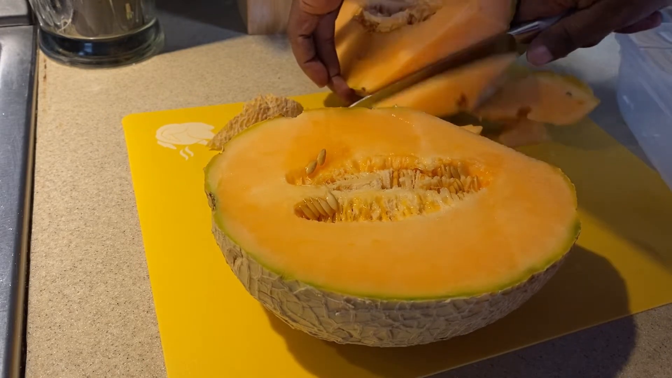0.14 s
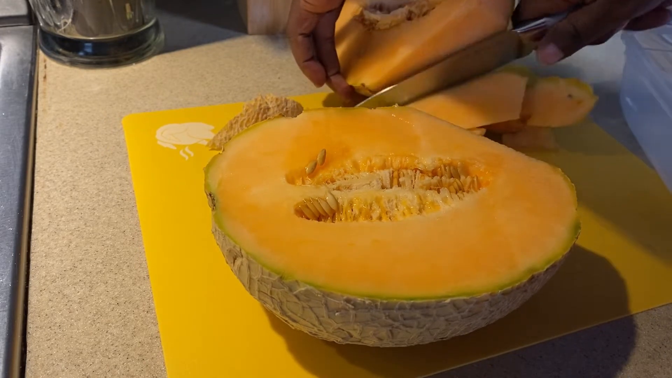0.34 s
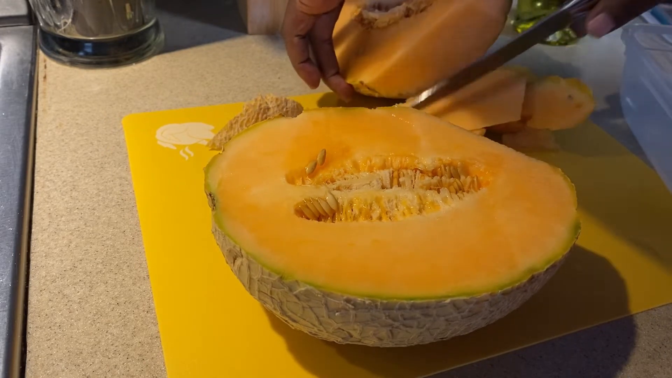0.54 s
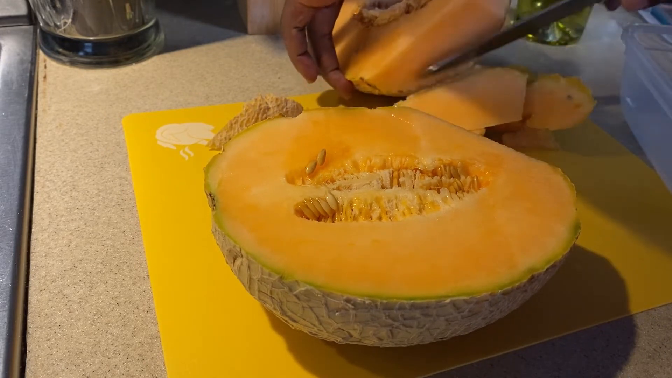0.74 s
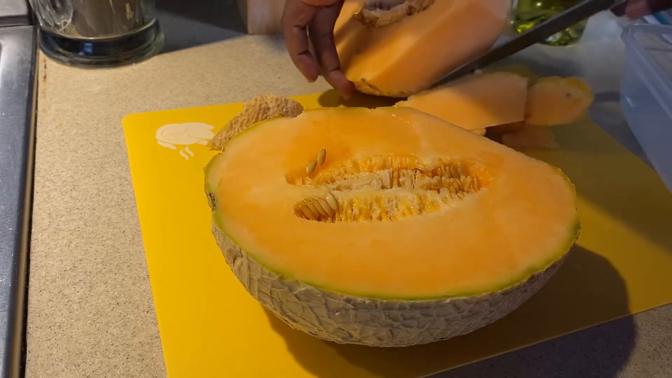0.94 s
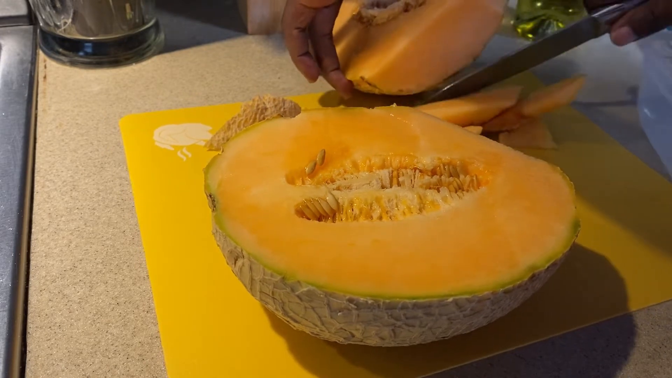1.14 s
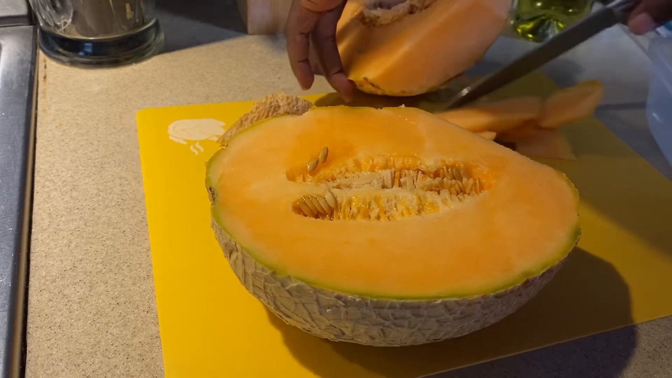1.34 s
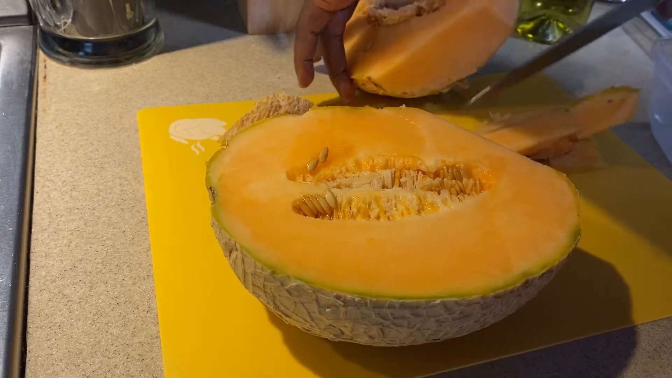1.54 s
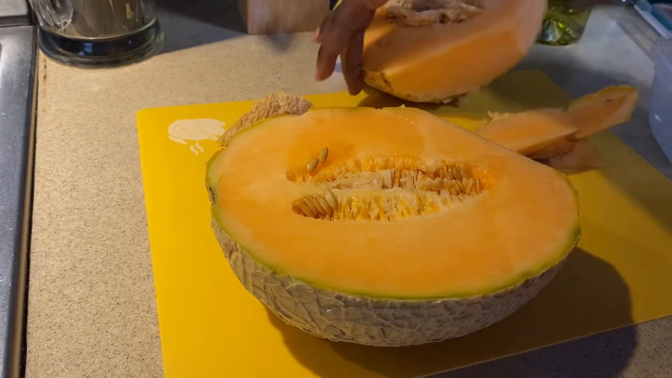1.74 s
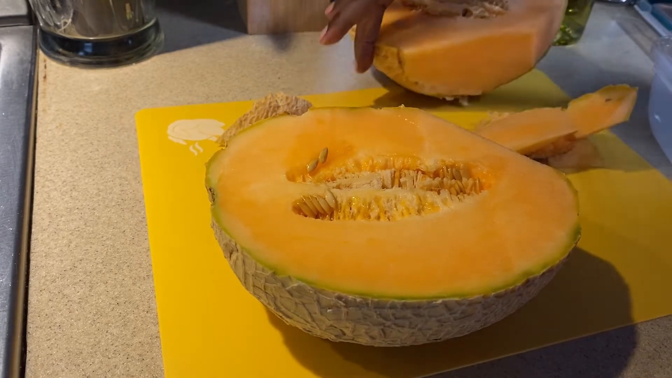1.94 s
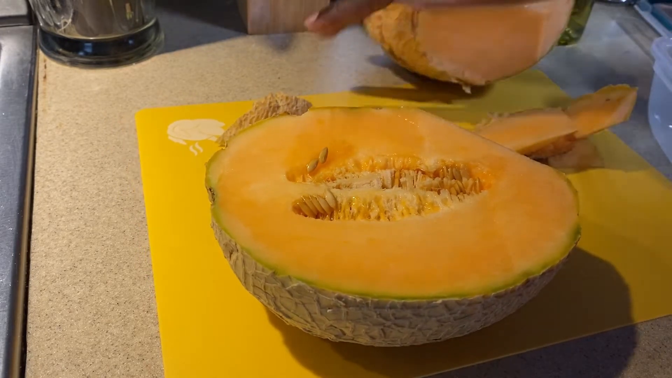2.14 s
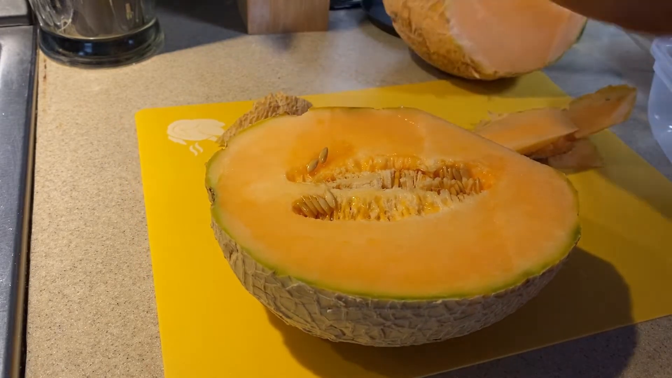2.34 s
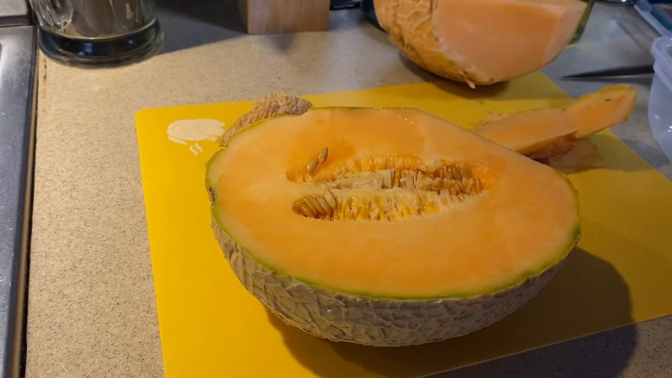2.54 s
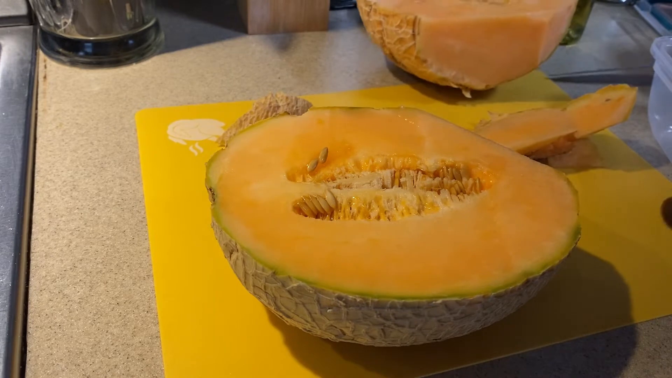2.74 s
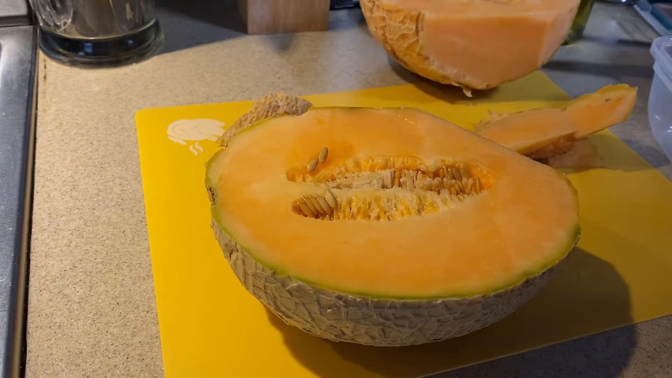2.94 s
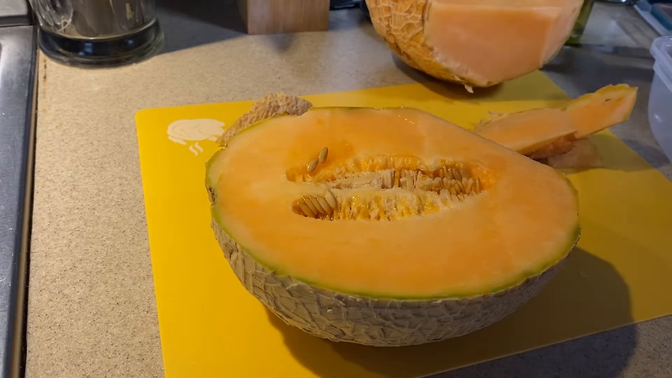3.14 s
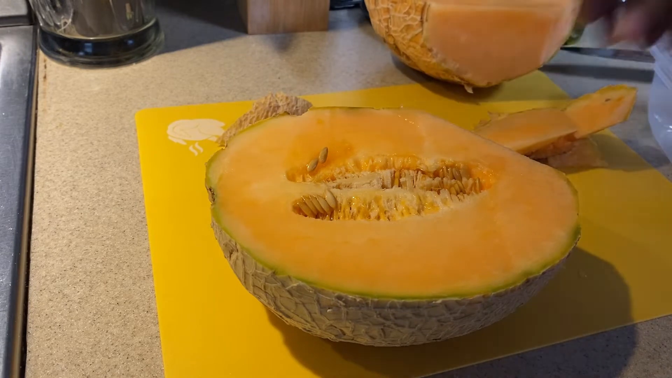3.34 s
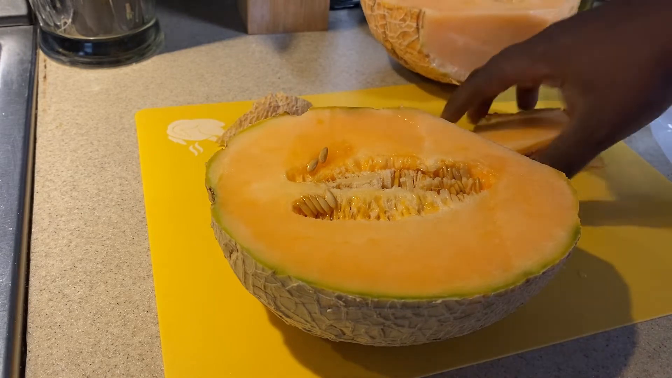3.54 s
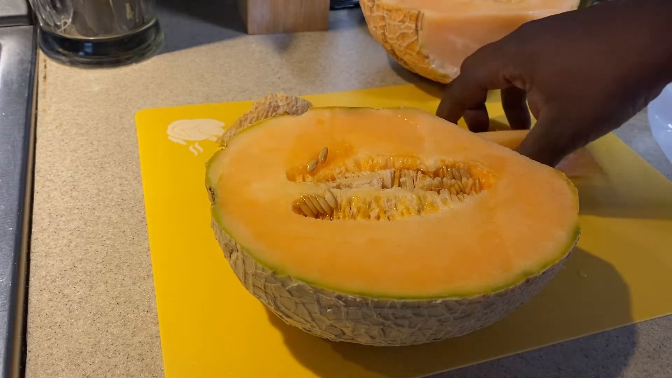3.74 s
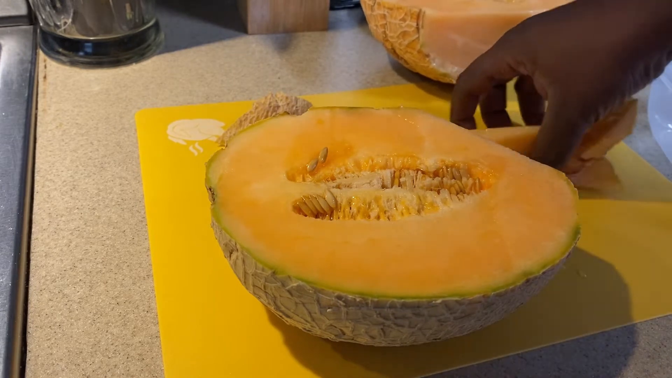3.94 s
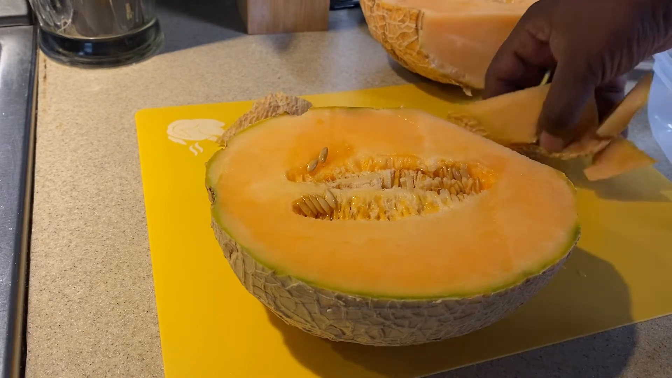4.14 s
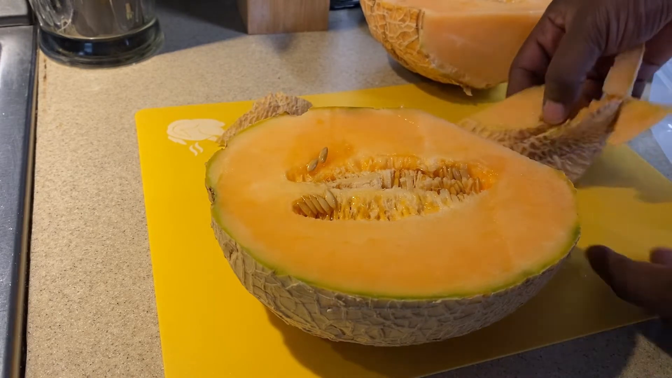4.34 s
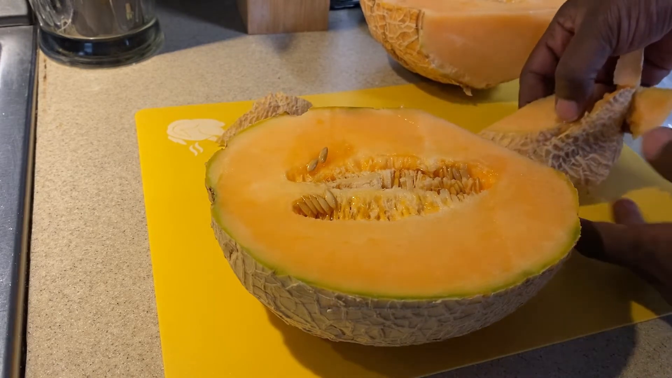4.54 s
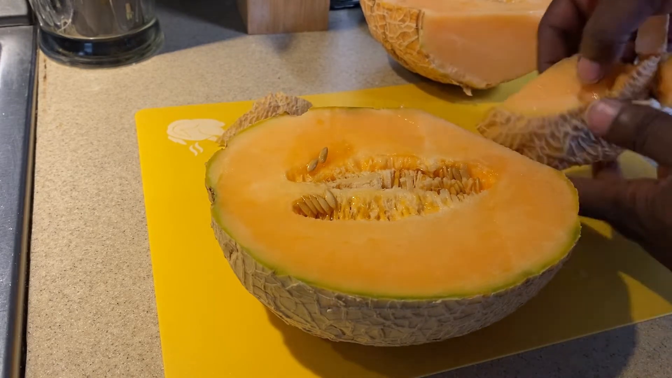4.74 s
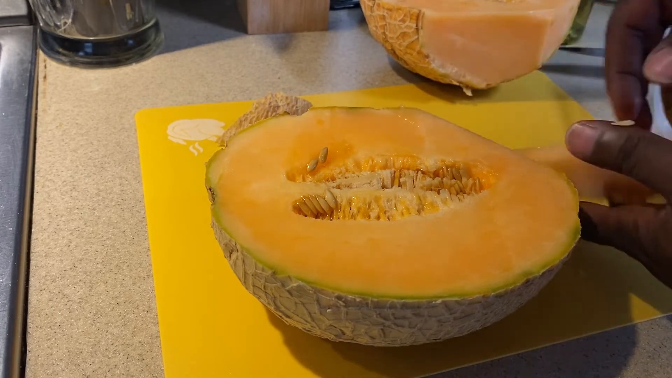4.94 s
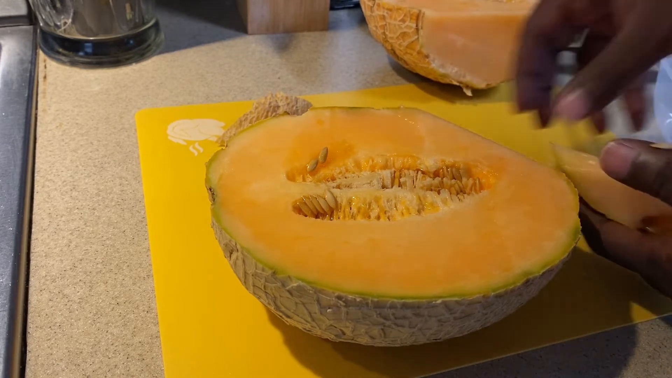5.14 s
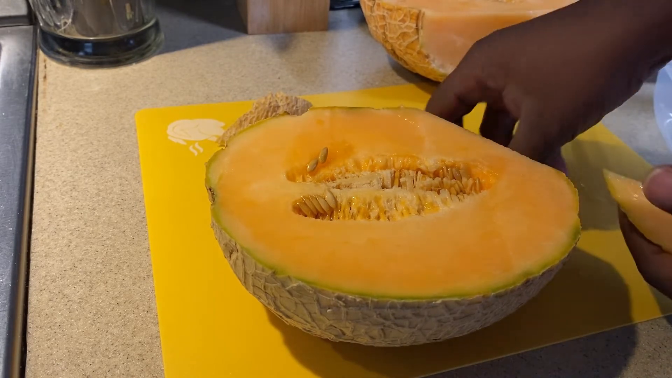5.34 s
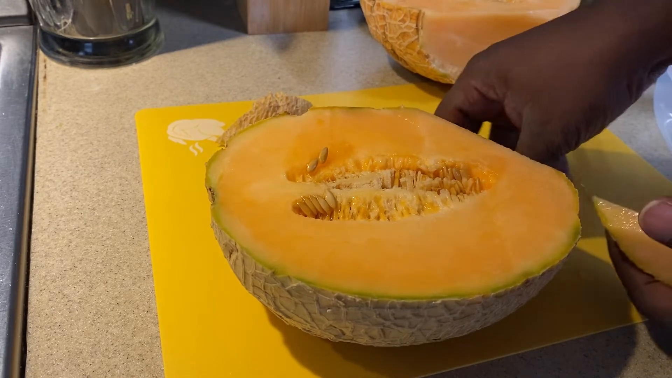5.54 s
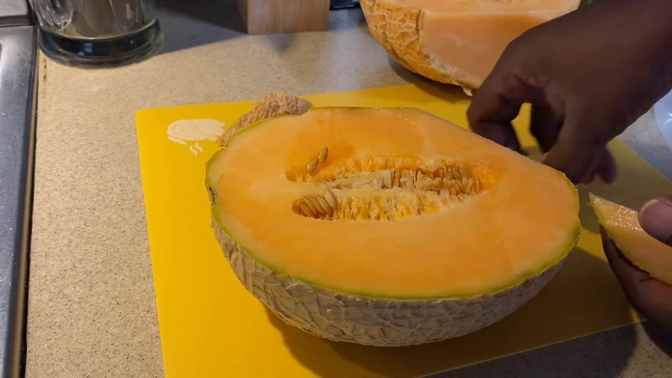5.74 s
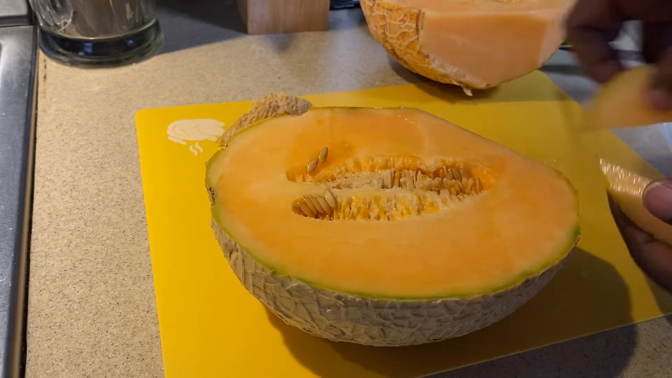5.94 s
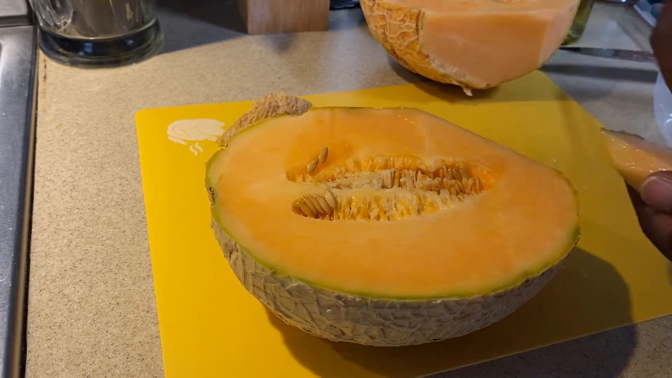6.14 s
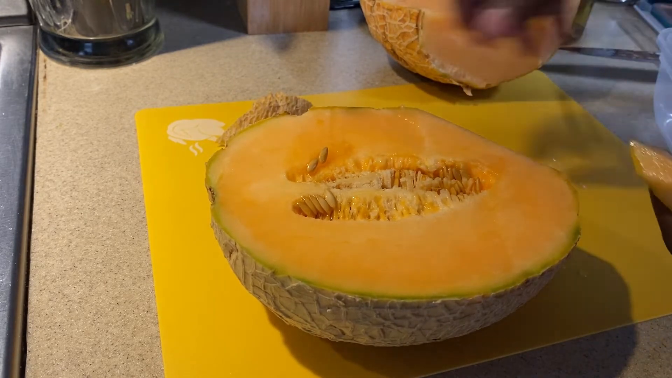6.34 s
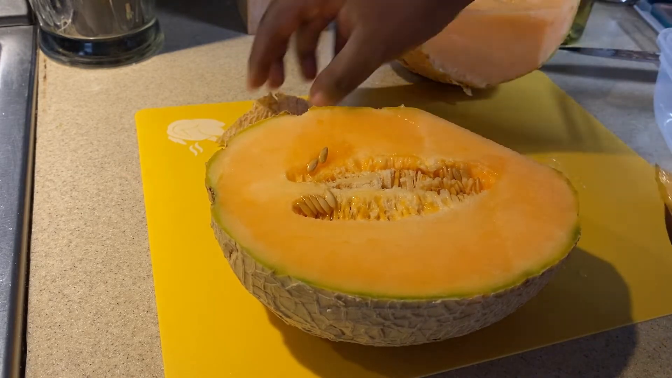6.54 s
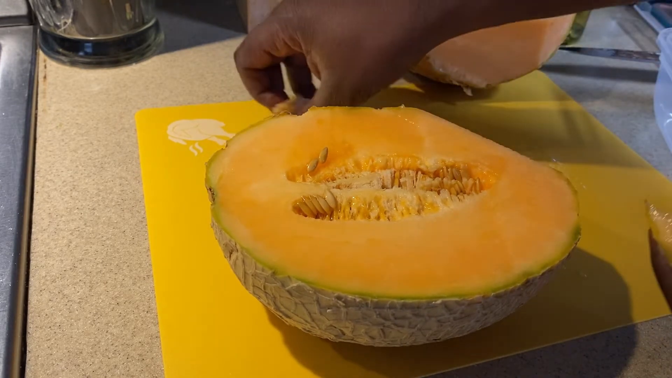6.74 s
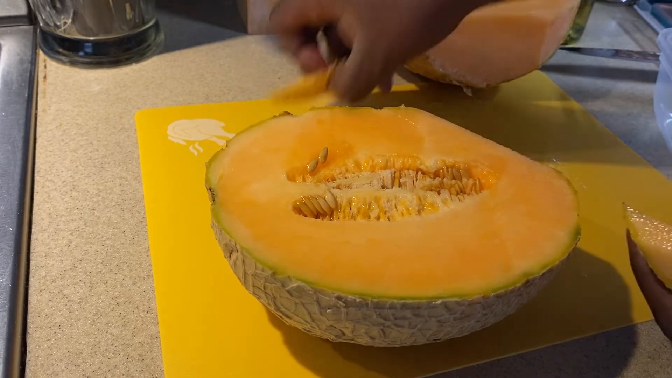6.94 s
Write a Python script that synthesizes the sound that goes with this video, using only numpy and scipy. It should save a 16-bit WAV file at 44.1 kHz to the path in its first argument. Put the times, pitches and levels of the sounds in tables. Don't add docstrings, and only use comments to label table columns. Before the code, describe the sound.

A close phone pickup in a small, hard kitchen with a very quiet, low room floor. From 0 to 0.35 seconds a knife makes a cluster of soft ticks and dull low knocks through melon onto a thin plastic board, with a faint steel ring near 0.45. After near quiet, at 1.0 to 1.2 it breaks through: a loud, crunchy double crack and woody knock, with a wet gritty scrape fading behind. Tiny scuffs follow around 1.7 and 2.2. At 2.5 the steel blade is laid down with a sharp clack and bright, quickly damped ring. From 2.95 to 3.25 the hollow melon half bumps down in rapid dull thuds over a low rumble. From 3.55 to 5.6 hands gather wet slices with soft hisses, drags, and light taps, the clearest near 3.65 and 5.3. A small tick and scuff come at 6.6, then tiny crackling scrapes near 7.

```python
import sys
import numpy as np
from scipy import signal
from scipy.fft import rfft, irfft, next_fast_len
from scipy.io import wavfile
from scipy.ndimage import uniform_filter1d, map_coordinates

SR = 44100
rng = np.random.default_rng(int(sys.argv[2]) if len(sys.argv) > 2 else 0)


def int16_out(signal):
    q = np.round(np.clip(np.atleast_2d(signal).T, -1, 1) * 32767)
    wavfile.write(sys.argv[1], SR, q.astype(np.int16))


def amplitude_ratio(level_db):
    exponent = np.asarray(level_db, float) / 20
    return 10 ** exponent


N = 308697


def unit(x):
    return x / np.sqrt(np.mean(x ** 2) + 1e-20)


def peak1(x):
    return x / (np.abs(x).max() + 1e-20)


def along(points, hz):
    f, v = np.transpose(points)
    return np.interp(np.log(hz + 1), np.log(f + 1), v)


def wobble(rate):
    knots = rng.standard_normal(int(N * rate / SR) + 4)
    return map_coordinates(knots, [np.arange(N) * rate / SR])


def filtered(x, response):
    n = x.shape[-1]
    m = next_fast_len(n + 8192)
    return irfft(rfft(x, m) * response(np.fft.rfftfreq(m, 1 / SR)), m)[..., :n]


def tilt(db_per_octave, hz):
    return amplitude_ratio(db_per_octave * np.log2((hz + 200) / 4000))


def radiated(hz):
    return (1j * hz / (1j * hz + 70)) ** 2


def add(track, s, sound, pan_db):
    lags = (8 if s < 1.5 else 1, 0)
    for ch, part in enumerate(np.broadcast_to(sound, (2, sound.shape[-1]))):
        track[ch, round(s * SR) + lags[ch]:][:len(part)] += part * amplitude_ratio(pan_db * (1.5 - ch))


def crackle(rate, size):
    ticks = (rng.random(N) < rate / SR) * rng.exponential(1, N)
    decay_s = 0.00049
    return 1 + size * signal.lfilter([1], [1, -np.exp(-1 / (decay_s * SR))], ticks)


def rush(spectrum, patchy_db, grit_db):
    # f/Hz, left-right likeness
    alike = [(60, 0.93), (240, 0.56), (950, 0.39), (3770, 0.73), (15000, 0.65)]
    z = signal.stft(rng.standard_normal((2, N)), nperseg=512)[2]
    field = uniform_filter1d(rng.standard_normal(z.shape[1:]), size=7, axis=0)
    field = uniform_filter1d(field, size=6, axis=1)
    pair = signal.istft(z * amplitude_ratio(patchy_db * unit(field)), nperseg=512)[1][:, :N]
    pair = pair * amplitude_ratio(grit_db * wobble(180))

    def shares(hz):
        turn = np.arccos(np.clip(along(alike, hz), 0, 1)) / 2
        return amplitude_ratio(along(spectrum, hz)) * [np.cos(turn), np.sin(turn)]

    mid, side = filtered(pair, shares)
    return unit(np.array([mid + side, mid - side]))


def held(rows, column, rise_db_s, fall_db_s):
    rows, t = np.array(rows), np.arange(N) / SR
    start, db = rows[:, :1], rows[:, column, None]
    end = start + abs(rows[:, 1:2])
    return amplitude_ratio(db - rise_db_s * np.maximum(start - t, 0) - fall_db_s * np.maximum(t - end, 0))


def sliding():
    # t/s, held/s, hiss level/dB, tilt/(dB/octave)
    strokes = [(0, 0.023, -75, 2.5), (0.368, 0.038, -78, -3.5), (1.0, 0.056, -76, 12.5),
               (1.173, 0.2, -54, -3), (2.3, 0.41, -72, -3.5), (3.101, 0.017, -58, -6),
               (3.3, 0.022, -78.5, -6), (3.719, 0.17, -67, -3.5), (3.9, 0.43, -67.5, -4),
               (4.379, .14, -61.5, 1), (4.939, 0.28, -80.5, 1.5), (5.33, .06, -72.5, -0.5),
               (5.481, .03, -66.5, -5), (6.67, 0.08, -66, -1.35)]
    # t/s, held/s, drag level/dB, counter rumble level/dB
    presses = [(0, 0.011, -64, -54.5), (.2, 0.008, -63, -43), (.31, 0.007, -53.5, -69),
               (1.15, 0.0026, -29.5, -44), (1.3, 0.13, -54.5, -64), (2.3, 0.12, -64, -62),
               (2.55, 0.06, -43.5, -54.5), (3.09, 0.12, -34.5, -42.5), (3.25, 0.01, -62, -51),
               (3.74, 0.065, -55.5, -59), (3.9, 0.646, -71, -67.5), (4.66, 0.021, -77, -59.5),
               (5.46, 0.15, -73.5, -71), (6.75, 0.19, -76.5, -66)]
    # t/s, rumble level/dB
    floor = [
        (0.0, -58),
        (0.25, -64.5),
        (7.0, -65.5),
    ]
    # f/Hz, density/(dB per Hz)
    hiss_colour = [(800, -19.5), (1400, -9), (3500, -6), (5500, -9), (7500, -7.5), (9500, -9.5),
                   (12000, -12), (14500, -14), (16000, -24), (16500, -61.5)]
    drag_colour = [(130, -34), (220, -7.5), (346, -0.5), (720, -9.5), (872, -8.5), (1020, -11),
                   (2200, -18.5), (2860, -28), (4840, -120)]
    rumble_colour = [(16, -27), (28, -7.5), (49, 7.5), (92, -8.5), (124, -10.5), (217, -18), (293, -22),
                     (400, -35.5), (520, -73), (880, -120)]
    seconds = np.arange(N) / SR

    stroke_gains = held(strokes, column=2, rise_db_s=166, fall_db_s=141.5)
    still, still_tilt_db = amplitude_ratio(-92), 1.8
    hiss_gain = stroke_gains.sum(axis=0) + still
    tilt_db = (np.array(strokes)[:, -1] @ stroke_gains + still * still_tilt_db) / hiss_gain
    hz, t, z = signal.stft(rush(hiss_colour, patchy_db=3.0, grit_db=-0.5), SR, nperseg=512)
    turned = z * tilt(np.interp(t, seconds, tilt_db), hz[:, None])
    hiss = unit(signal.istft(turned, SR, nperseg=512)[1][:, :N] * crackle(60, .55))

    room = amplitude_ratio(np.interp(seconds, *np.transpose(floor)))
    drag_gain = held(presses, column=2, rise_db_s=278.5, fall_db_s=199.5).sum(axis=0)
    rumble_gain = held(presses, column=3, rise_db_s=278.5, fall_db_s=199.5).sum(axis=0)
    drag = (drag_gain + amplitude_ratio(-16) * room) * rush(drag_colour, patchy_db=3.0, grit_db=0.5)
    rumble = rush(rumble_colour, patchy_db=0.5, grit_db=-2.0)
    rumble = amplitude_ratio(1) * room * rumble + rumble_gain * unit(filtered(rumble, radiated))

    jerk = 1.4 * wobble(25)
    light = amplitude_ratio(jerk + 5.5) * hiss_gain * hiss
    return light + amplitude_ratio(jerk - 0.5) * drag + amplitude_ratio(jerk + wobble(2.5) + 4.0) * rumble


def crack(t, t60, tilt_db):
    # f/Hz, density/(dB per Hz)
    snap_colour = [(600, -12.5), (1200, -4.5), (2200, -12), (4000, -16), (6000, -23), (8000, -14),
                   (11000, -25.5), (14000, -20.5), (16000, -29.5), (16700, -52)]
    burst = filtered(rng.standard_normal(len(t)), lambda hz: amplitude_ratio(along(snap_colour, hz)) * tilt(tilt_db, hz))
    crunch = filtered(burst, lambda hz: tilt(-3, hz))
    snap = burst * amplitude_ratio(-60 * t / t60) + crunch * amplitude_ratio(-27.5 - 60 * t / 0.06)
    return peak1((1 - np.exp(-t / 0.0076)) * snap)


def body(peaks):
    def response(f):
        return sum((-1) ** k * amplitude_ratio(db) * 1j * f * w / (c * c - f * f + 1j * f * w)
                   for k, (c, w, db) in enumerate(peaks))
    return response


def struck(t, peaks, push_s):
    near, apart = rng.standard_normal((2, len(t))) * amplitude_ratio(-60 * t / push_s)
    return peak1(filtered(np.array([near + 0.08 * apart, near - 1.3 * apart]), body(peaks)))


def knocks():
    # t/s, crack peak level/dB, knock level/dB re crack, knock f/Hz, left-right/dB
    board_knocks = [(0.0918, -36.5, 6.5, 708, 1), (0.1583, -37.5, 21, 512.5, 6.5),
                    (0.2599, -45, 20, 645, 4.5), (0.3213, -53, 14, 342, 4), (0.9919, -39.5, 10, 599.7, 4),
                    (1.0804, -13.5, 7, 290, 7), (1.1458, -2, 1, 620.4, 3.5), (2.048, -71.5, 17, 427, 3.5),
                    (2.328, -43.5, 4, 583, -8), (2.3993, -45, 9, 546, 0.5), (2.5414, -20.5, -1.5, 1390, 3),
                    (2.617, -42, 8.5, 481, 0), (2.8254, -50, 6.5, 1032, -6), (4.8537, -58, 26.5, 619.5, 4),
                    (4.9062, -48, 11, 703, 3.5), (4.9135, -54.5, 12, 908, 2.5),
                    (6.991, -41.5, -6, 1300, 4.5)]
    # t/s, crack peak level/dB, knock level/dB re crack, left-right/dB
    edge_ticks = [(.0856, -47, -6, 6.5), (.1131, -39, 1, 8.5), (.1375, -36, 1.5, 5), (.1544, -40, 8, 0),
                  (.2054, -45, -26, 5), (1.6996, -36.5, -16, 2), (1.933, -59, -18.5, -1),
                  (2.513, -7.5, -9, 4), (3.5522, -32.5, -8.5, 0), (3.6102, -53, 3, 9),
                  (3.9473, -54, -10.5, 0), (4.3165, -42.5, -13, -6.5), (4.8405, -46, 5.5, 0.5),
                  (5.2525, -58, 0, 5.5), (6.5858, -29, -14, 3.5), (6.63, -40.5, 0, 5.5)]
    # f/Hz, width/Hz, level/dB
    board = [(314, 32, 1), (598, 110, 0), (950, 810, -11.5), (1300, 180, -10), (1510, 40, -17.5),
             (2460, 600, -20.5)]
    out, t = np.zeros((2, N + SR)), np.arange(SR // 5) / SR
    contacts = [(*row, 0.11, -0.028 * (row[1] + 40)) for row in board_knocks]
    tick_hz, tick_t60, tick_tilt_db = 290, .045, 6
    contacts += [(s, db, knock_db, tick_hz, pan_db, tick_t60, tick_tilt_db)
                 for s, db, knock_db, pan_db in edge_ticks]
    sharp, sag_s = .7, 0.0049
    sagged = t + sharp * sag_s * (1 - np.exp(-t / sag_s))
    for s, db, knock_db, hz, pan_db, t60, tilt_db in contacts:
        phase = 2 * np.pi * hz * sagged
        spot = np.sin(phase) + amplitude_ratio(-11.5) * np.sin(2 * phase)
        spot = spot * amplitude_ratio(-60 * t / t60) * (1 - np.exp(-t / .0015))
        knock = peak1(peak1(spot) + 3.9 * struck(t, board, push_s=0.031))
        add(out, s - .0008, amplitude_ratio(db) * crack(t, 0.0078, np.clip(tilt_db, -7, 7)), pan_db)
        add(out, s, amplitude_ratio(db + knock_db) * knock, pan_db - 5.5)
    return out[:, :N]


def counter_thumps():
    # t/s, peak level/dB, f/Hz, t60/s
    thumps = [(0.092, -31.5, 178, 0.1), (0.169, -23, 176, 0.1), (0.259, -34, 79, 0.12),
              (0.805, -47, 80.4, 0.15), (1.079, -8.5, 200, 0.025), (1.147, -22, 214, 0.12),
              (1.718, -46.5, 196, 0.13), (2.324, -33, 69.8, 0.41), (2.513, -20, 183, 0.033),
              (3.553, -29.5, 97.4, 0.11), (4.592, -42, 170.7, 0.12), (4.849, -42.5, 228, 0.17),
              (5.313, -34.5, 90.4, 0.058), (6.581, -43, 204, 0.18), (0.994, -35, 130, .12),
              (1.082, -23, 94, 0.13), (4.86, -42.5, 130.6, 0.26), (5.33, -53, 269, 0.16),
              (6.59, -45, 102, 0.24), (3.6, -51.5, 272.4, 0.34)]
    out, t = np.zeros((2, N + SR)), np.arange(SR // 5) / SR
    for s, db, hz, t60 in thumps:
        fade = amplitude_ratio(db - 60 * t / max(t60, .03))
        add(out, s, fade * np.sin(2 * np.pi * hz * t) * (1 - np.exp(-t / 0.006)), 0)
    return out[:, :N]


def scuffs():
    # t/s, rms level/dB, centre f/Hz, width/octaves, t60/s
    flicks = [(.322, -54, 1300, 1.8, 0.16), (.323, -60.5, 2210, 0.31, 0.27), (1.155, -28, 1360, 0.5, 0.28),
              (1.153, -36, 3480, 1.2, .15), (1.088, -36, 1090, 1.5, .3), (1.71, -61.5, 3000, 2.12, 0.336),
              (1.81, -70, 11930, .8, 0.45), (2.52, -43, 9300, 1.6, 0.34), (2.548, -39, 5528, 1.2, .12),
              (3.618, -54, 3000, 2.6, 0.23), (3.662, -50, 950, 0.82, 0.29), (3.812, -55, 3880, .5, 0.041),
              (3.884, -57.5, 2490, 0.74, 0.088), (.43, -64, 6400, 3.3, 0.33),
              (.748, -63.5, 5500, 7.1, 0.18), (.754, -67, 1070, 0.57, 0.17),
              (3.668, -40.5, 4540, 1.2, 0.16), (4.326, -50.5, 6380, 1.2, 0.26),
              (4.36, -54.5, 3110, 0.74, .2), (4.41, -53, 4100, 1.2, 0.23), (4.49, -52, 3950, 0.58, 0.31),
              (4.575, -51, 877, 2.4, 0.286), (4.6, -49, 332, 1.39, 0.3), (4.87, -51, 488, 1.4, 0.29),
              (5.311, -39.5, 3130, 0.69, 0.0845), (5.332, -48.5, 3084, 2.9, 0.25),
              (5.515, -51, 3314, 0.89, 0.33), (5.585, -54.5, 2900, 1.3, 0.186),
              (6.635, -45.5, 4215, 1.8, .14)]
    # t/s at peak, rms level/dB, centre f/Hz, width/octaves, rise/s
    swells = [(2.962, -59, 2716, 1.5, 0.023), (1.06, -42, 885, 0.81, .045), (1.076, -45, 3977, 3.1, 0.045),
              (1.143, -35.5, 3120, 0.69, .009), (1.38, -50.5, 5330, 1.1, 0.025),
              (2.2, -67, 2350, 0.85, 0.096), (2.29, -58.5, 2240, 0.51, 0.11),
              (2.27, -64.5, 5650, 1.5, 0.15), (2.508, -42.5, 3088, 1.7, 0.0095),
              (3.658, -43, 4755, 2.51, 0.02), (3.79, -47, 955, 0.76, .027), (4.23, -51, 1773, 1.7, .06),
              (5.37, -49.5, 3610, 1.33, 0.021), (5.4, -49.5, 3484, 1.6, .02), (5.43, -54, 4153, 1, 0.027),
              (5.535, -54, 5460, 0.31, 0.035), (5.63, -65, 3440, 2.6, 0.028),
              (6.27, -73.5, 5840, 2.24, 0.15), (6.38, -67, 2947, 1.8, 0.072),
              (6.587, -43, 4510, 1.3, 0.0077), (6.951, -55, 2000, 1.3, 0.004),
              (6.993, -49, 1390, 1.1, 0.03), (6.927, -60.5, 1700, 1, .004), (6.941, -59, 1800, 1, .004),
              (6.966, -50, 2000, 1.5, 0.0047), (6.976, -57, 2495, 1.7, .004),
              (6.984, -49, 2380, 1.6, 0.0036), (6.582, -45, 3553, 2.5, .004), (6.61, -55, 3483, 1.8, .02),
              (2.14, -70, 2300, .5, .08)]
    top_edge = [(100, -40), (16000, -0.5), (16600, -64.0)]  # f/Hz, level/dB; acts above 16 kHz
    out, t = np.zeros((2, N + SR)), np.arange(SR // 2) / SR
    flick_rise_s = 0.0077
    bursts = [(*row[:-1], flick_rise_s, row[-1]) for row in flicks]
    bursts += [(*row, .33 * (10 * row[-1]) ** 1.35) for row in swells]
    for s, db, hz, octaves, rise, t60 in bursts:
        grit = amplitude_ratio(3.5 * unit(uniform_filter1d(rng.standard_normal(len(t)), size=90)))
        grit = grit * crackle(200, .4)[:len(t)]
        near, apart = rng.standard_normal((2, len(t))) * grit
        bumps_db = 3 * rng.standard_normal(100)

        def patch(f):
            colour_db = along(top_edge, f) * (f > 16000) + np.interp(f / 240, np.arange(100), bumps_db)
            return amplitude_ratio(colour_db) / (1 + (np.log2((f + 1) / hz) / octaves * 2) ** 2)

        pair = filtered(np.array([near + 0.11 * apart, near - 0.95 * apart]), patch)
        shape = np.where(t < rise, (t / rise) ** 1.5, amplitude_ratio(-60 * (t - rise) / t60))
        out[:, round((s - rise) * SR):][:, :len(t)] += amplitude_ratio(db) * unit(pair) * shape
    return out[:, :N]


def blade():
    # t/s, ring level/dB, damped after/s, then t60/s, tilt/(dB/octave)
    touches = [
        (.444, -53, 0.021, 0.45, -1),
        (0.744, -69, 0.042, 0.055, -2.5),
        (1.8, -74, 0.11, 0.24, 6),
        (2.512, -20.5, 0.52, .1, -1),
        (2.543, -40.5, 0.017, .14, 0.5),
        (3.041, -43, 0.033, 0.086, 4),
        (3.092, -50, 0.016, .08, 4),
        (3.143, -45, 0.054, .1, -7.5),
        (3.218, -50, 0.04, .1, -3),
    ]
    mode_hz = [1098, 1276, 1809, 2190, 2739, 3349, 4253, 4328, 4630, 4905, 5389, 6036, 7617, 7855, 8188,
               9790, 10040, 10200, 10790, 11090, 11900, 12200, 14320]
    # level/dB, t60/s
    modes = [(-15.5, 0.77), (-18.5, 0.43), (-24, 0.29), (-16, .78), (-11, .32), (-6, 0.29), (-17, 0.3),
             (-27, .35), (-13, .4), (-11, .19), (-27.5, .24), (-11.5, 0.28), (-35, .5), (-10.5, 0.29),
             (-34, .37), (-10, 0.33), (-17.5, .32), (-22, .19), (-23.5, .33), (-29, .34), (-14, 0.27),
             (-31, .29), (-21.5, 0.27)]
    out, t = np.zeros((2, N + SR)), np.arange(SR * 3 // 4) / SR
    hz = np.array(mode_hz)[:, None]
    mode_db, t60 = np.transpose(modes)[:, :, None]
    late_hz, late_s = 4630, .065
    filling = 1 - (abs(hz / late_hz - 1) < .01) * np.exp(-(t / late_s) ** 2)
    for s, db, stop, damped, tilt_db in touches:
        rise = 0.0003 * amplitude_ratio(-.4 * (db + 19.5))
        beat, turn, pan = rng.uniform(-1, 1, (3, len(modes), 1))
        depth = .6 * np.minimum(hz / 3500, 1) ** 2
        pairs = 1 - depth * np.sin(2 * np.pi * hz * .0017 * t + 3 * beat)
        fade = amplitude_ratio(db + mode_db - 60 * t / t60 - 60 * np.maximum(t - stop, 0) / damped)
        decay = pairs * tilt(tilt_db, hz) * fade * filling
        for ch, sign in enumerate((1, -1)):
            ring = decay * amplitude_ratio(3 * sign * pan) * np.sin(2 * np.pi * hz * t + .7 * sign * turn)
            out[ch, round(s * SR):][:len(t)] += ring.sum(axis=0) * (1 - np.exp(-t / rise))
    return out[:, :N]


def rocking():
    # t/s, crack peak level/dB, knock level/dB re crack, thump level/dB re crack, left-right/dB
    rocks = [(2.964, -22, 7.5, -10.5, -1), (2.9718, -32.5, -0.5, -4.5, 5), (3.016, -28.5, 10, -3, -1),
             (3.037, -25.5, 6, -5, 2.5), (3.0407, -19, 4, 0, 1), (3.0532, -24, 1, -2, 0.5),
             (3.0598, -33.5, -1.5, 4.5, 0), (3.0921, -28.5, -3.5, 1.5, 0.5), (3.1082, -43, 3.5, 0, 0),
             (3.134, -25.5, 9, -15, 0.5), (3.142, -26, 5, -13, 0.5), (3.1536, -28, -7.5, -24.5, 0),
             (3.1753, -32.5, 2.5, -7.5, 7), (3.211, -27.5, -3.5, -4.5, -3.5), (3.2183, -25.5, 2, -6.5, 2.5),
             (3.2473, -55.5, 25.5, 0, -1)]
    # f/Hz, width/Hz, level/dB
    melon = [(384, 46, 1), (530, 100, -5), (1062.6, 85, -9), (1690, 61, -15.5), (2224, 200, -20.5),
             (3680, 410, -21)]
    # f/Hz, width/Hz, level/dB
    counter = [(115.3, 40, 0)]
    out, t = np.zeros((2, N + SR)), np.arange(SR // 4) / SR
    for s, db, knock_db, thump_db, pan_db in rocks:
        snap = crack(t, 0.018, tilt_db=-0.5)
        pitch = 1 + .1 * rng.uniform(-1.2, 1)
        knock = amplitude_ratio(knock_db) * struck(t, np.multiply(melon, (pitch, 1, 1)), 0.05)
        thump = amplitude_ratio(thump_db) * struck(t, counter, 0.4)
        add(out, s - .001, amplitude_ratio(db) * (snap + knock + thump), pan_db)
    return out[:, :N]


def kitchen(x):
    # f/Hz, t60/s
    decay_times = [(150, 0.66), (1000, 0.33), (4000, 0.37), (12000, 0.17)]
    hz, t, z = signal.stft(rng.standard_normal((2, SR // 2)), SR, nperseg=256)
    tail = signal.istft(z * amplitude_ratio(-60 * t / along(decay_times, hz)[:, None]), SR, nperseg=256)[1]
    delayed = np.pad(x, ((0, 0), (200, 0)))
    return signal.fftconvolve(delayed, tail / np.linalg.norm(tail[0]), axes=1)[:, :N]


def scene():
    hits = filtered(knocks() + counter_thumps() + rocking(), radiated)
    steel = blade()
    answer = kitchen(amplitude_ratio(-12.5) * hits + amplitude_ratio(-14) * steel)
    return hits + steel + answer + scuffs() + sliding()


def low_pass(x):
    return signal.sosfilt(signal.butter(12, 16820, fs=SR, output="sos"), x)


def record(dry):
    # f/Hz, left-right/dB
    ports = [(100, -1.5), (400, -1.5), (900, -1), (2000, 2), (3500, 3.5), (6000, 2.5)]
    # from f/Hz, to f/Hz
    dropped = [
        [(8450, 9550), (12750, 13850)],
        [(6500, 7400), (10500, 11700), (14900, 20000)],
    ]

    def pickup(hz):
        return (1j * hz / (1j * hz + 36)) ** 4 * amplitude_ratio(along(ports, hz) * np.array([[.5], [-.5]]))

    dry = filtered(dry, pickup)
    mid, side = (dry[0] + dry[1]) / 2, (dry[0] - dry[1]) / 2
    widened_hz, lag_s = 6400, 10 / SR
    mono_bass_hz = 260
    side = filtered(side, lambda hz: (hz < widened_hz) * (0.44 + hz ** 2 / (hz ** 2 + mono_bass_hz ** 2)))
    low = filtered(mid, lambda hz: hz < widened_hz)
    left = low + side + filtered(low - mid, lambda hz: np.exp(-2j * np.pi * hz * lag_s))
    right = mid - side

    def kept(hz):
        edge_hz = 200
        holes = [sum(np.clip(np.minimum(hz - a, b - hz) / edge_hz + .5, 0, 1) for a, b in bands)
                 for bands in dropped]
        return amplitude_ratio(-20 * np.array(holes))

    mid, side = filtered(np.array([left + right, left - right]) / 2, kept)
    pair = np.array([mid + side, mid - side])
    top = .9
    limited = pair / (1 + np.abs(pair / top) ** 6) ** (1 / 6)
    finished = filtered(limited, lambda hz: hz < 16800)
    return low_pass(finished)


dry = scene()
out = record(dry)
int16_out(out)
```